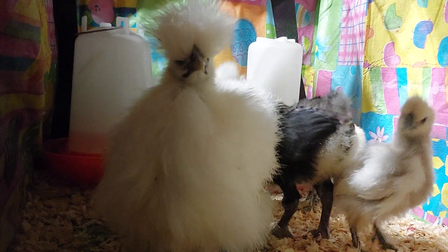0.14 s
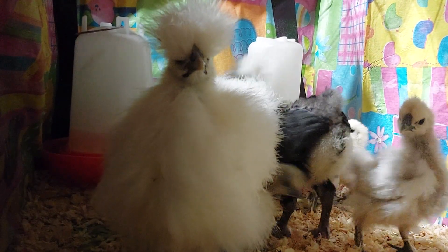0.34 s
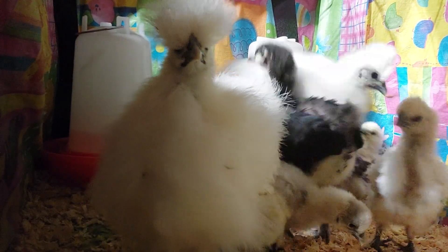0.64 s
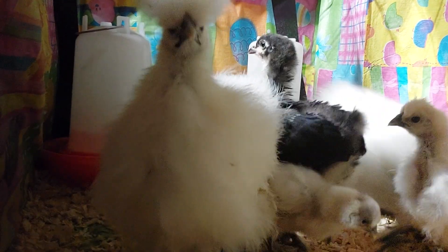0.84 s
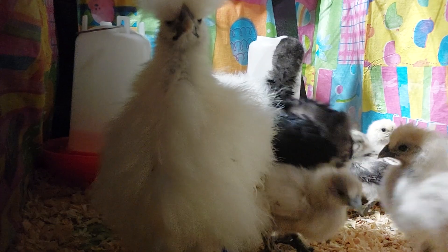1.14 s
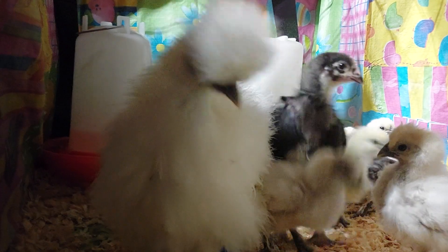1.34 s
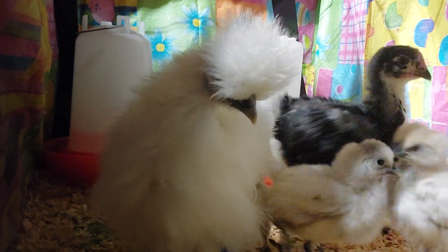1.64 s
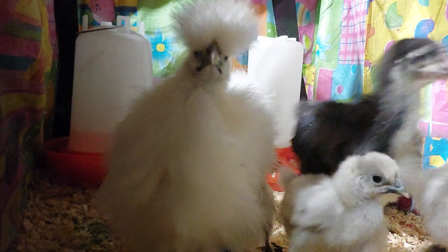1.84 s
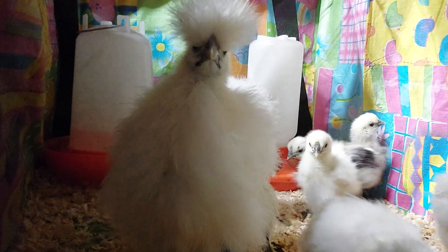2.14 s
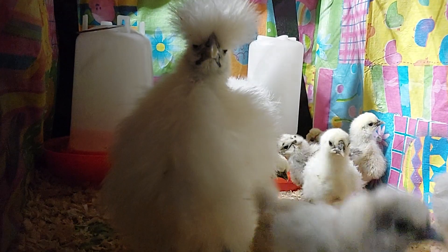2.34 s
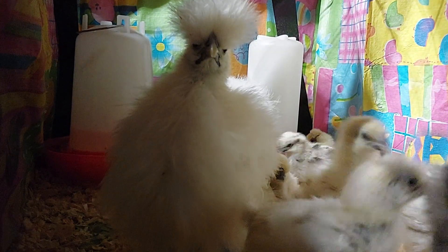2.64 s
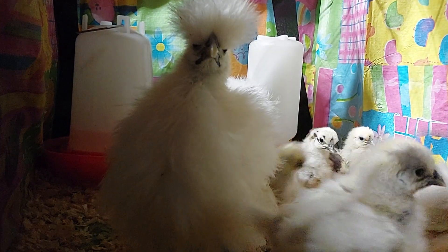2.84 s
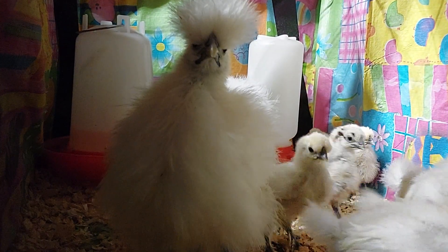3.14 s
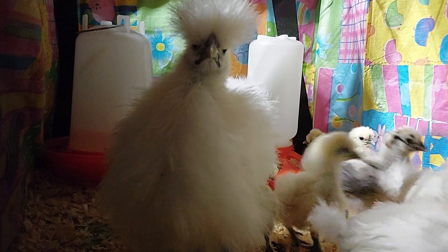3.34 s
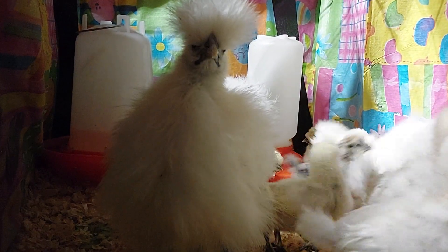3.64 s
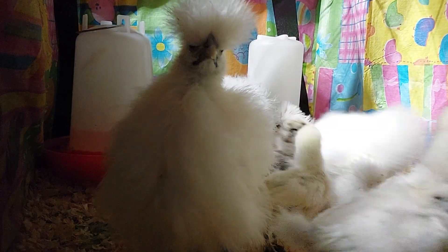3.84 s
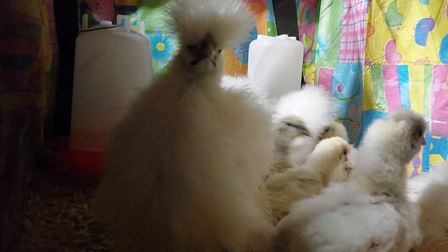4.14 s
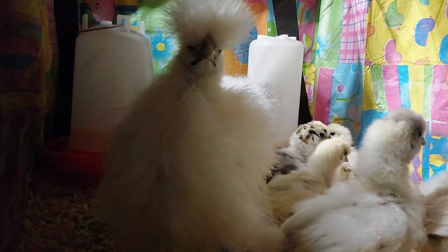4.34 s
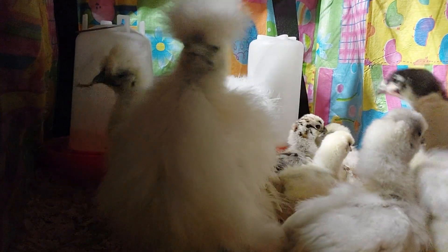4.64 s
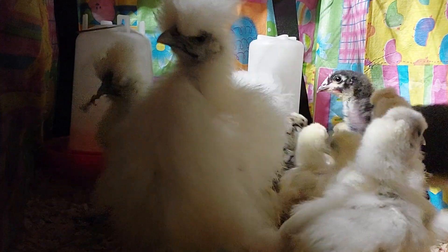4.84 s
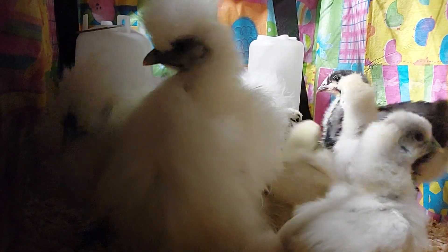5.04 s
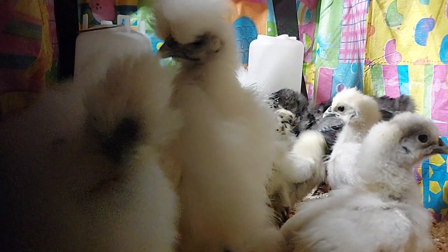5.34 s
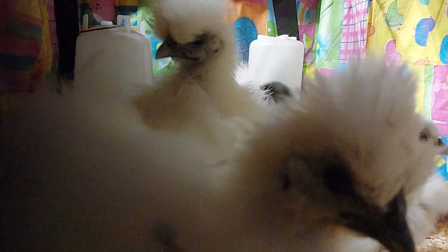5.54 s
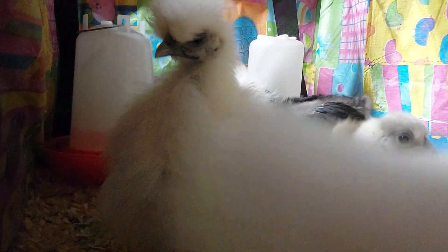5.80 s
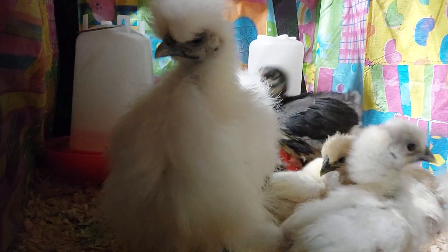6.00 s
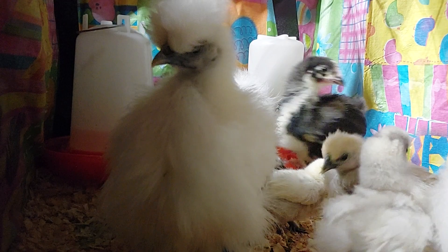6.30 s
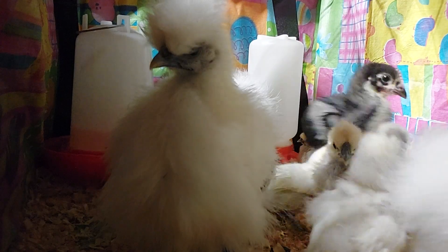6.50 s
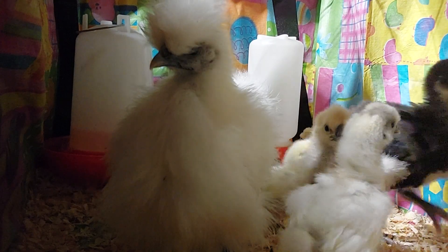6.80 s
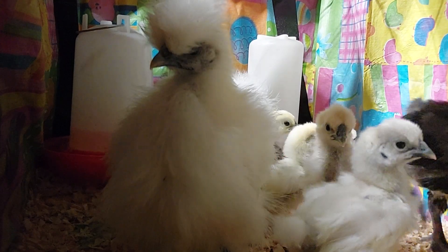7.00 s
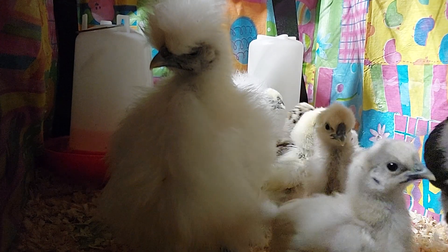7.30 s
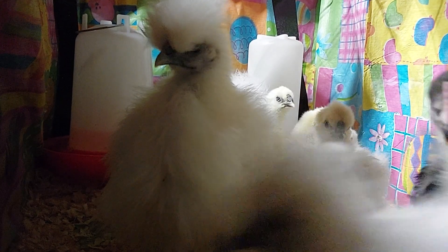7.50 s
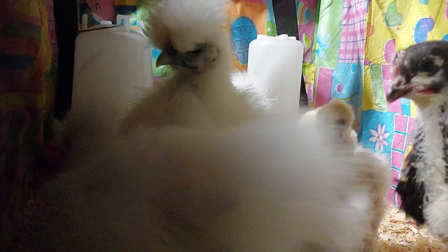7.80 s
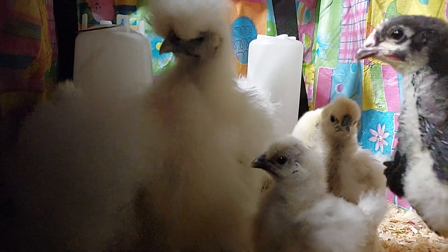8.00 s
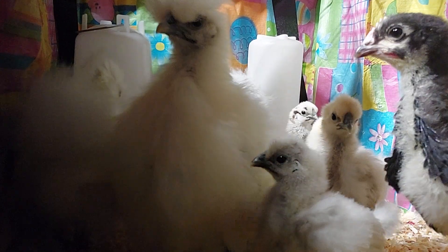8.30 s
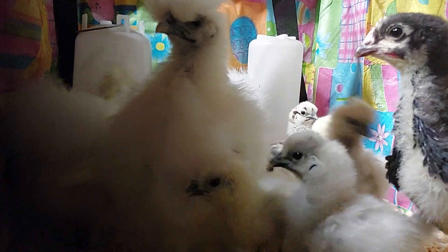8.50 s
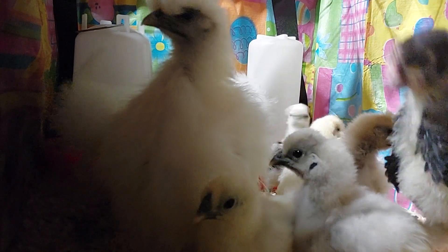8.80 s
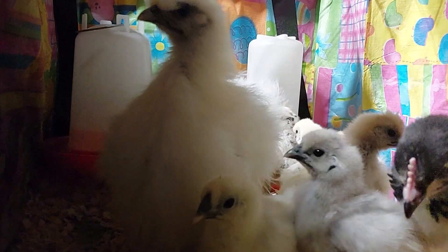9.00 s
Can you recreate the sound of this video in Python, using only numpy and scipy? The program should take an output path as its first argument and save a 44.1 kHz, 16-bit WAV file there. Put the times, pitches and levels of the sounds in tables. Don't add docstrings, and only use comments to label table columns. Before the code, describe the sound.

Crowded chicks peep brightly close by in a bedded pen, with raspy downward slides, low gulps, floor bumps and claws scuffing dry flakes.

```python
import sys
import numpy as np
from scipy import signal
from scipy.io import wavfile
from scipy.ndimage import uniform_filter1d

SR = 44100
rng = np.random.default_rng(int(sys.argv[2]) if len(sys.argv) > 2 else 0)


def file_out(sig):
    cols = np.atleast_2d(sig).T
    lim = np.clip(cols, -1, 1)
    pcm = np.round(lim * 32767).astype(np.int16)
    wavfile.write(sys.argv[1], SR, pcm)


def gain_from_db(level_db):
    decades = np.asarray(level_db, float) / 20
    return 10 ** decades


N = 403515


def rms_one(x):
    return x / np.sqrt(np.mean(x ** 2) + 1e-20)


def drift(rate_hz, count=N):
    r = np.exp(-2 * np.pi * rate_hz / SR)
    noise = rng.standard_normal(count + 9000)
    return rms_one(signal.lfilter([1], [1, -2 * r, r * r], noise)[9000:])


def band(x, low_hz, high_hz):
    sos = signal.butter(2, [low_hz, min(high_hz, SR * .45)], "band", fs=SR, output="sos")
    return signal.sosfilt(sos, x)


def ring(clicks, hz, t60_s):
    r, w = gain_from_db(-60 / (t60_s * SR)), 2 * np.pi * hz / SR
    return signal.lfilter([0, np.sin(w)], [1, -2 * r * np.cos(w), r * r], clicks + 1e-18)


def add(out, start, sound, pan_db, lag_ms):
    steps = np.arange(len(sound))
    for side, sign in enumerate((1, -1)):
        late = np.interp(steps - sign * lag_ms * SR / 2000, steps, sound)
        out[side, start:start + len(sound)] += (late * gain_from_db(sign * pan_db / 2))[:N - start]


def shavings(rustle_db):
    # hz, level_db per Hz
    flake_colour = [(350, -17.5), (700, -21), (1400, -20), (2900, -19.5), (5000, -18), (7500, -21.5),
                    (10000, -25), (12500, -22.5), (15500, -21)]
    # start_s, peak_db
    scratches = [(1.715, -70), (2.081, -55.5), (2.142, -50), (2.222, -65.5), (2.794, -60.5), (3.632, -68),
                 (6.6408, -58), (8.942, -72.5), (0.216, -85.5), (.412, -87), (4.598, -59), (7.6, -99),
                 (1.041, -66), (1.242, -59), (3.554, -90), (5.362, -71), (5.433, -64), (3.268, -64),
                 (4.39, -78), (7.284, -86), (.868, -69.5), (5.94, -68)]
    hz, per_hz_db = np.transpose(flake_colour)
    grain_chance = 400 * gain_from_db(3.5 * drift(8)) / SR
    grains = 1 + (rng.random((2, 2, N)) < grain_chance) * gain_from_db(18.0)
    white = rng.standard_normal((2, 2, N)) * grains
    own_db = [2.0 * drift(14) for k in range(3)]
    together_db = 3.0 * drift(25)
    out, edges_hz = 0, 250 * 2 ** np.arange(0, 6.5, .5)
    for k, (low, high) in enumerate(zip(edges_hz, edges_hz[1:])):
        colour_db = np.interp(np.log(low * high) / 2, np.log(hz), per_hz_db)
        gain_db = colour_db + together_db + own_db[k // 2 % 3]
        out = out + gain_from_db(gain_db) * band(white[k % 2], low, high)

    kicks = np.zeros(N)
    for s, db in scratches:
        kicks[int(s * SR)] = gain_from_db(db + 13.0)
    fade = np.exp(-1 / (0.012 * SR))
    bursts = uniform_filter1d(signal.lfilter([1], [1, -fade], kicks + 1e-18), 200, origin=99)
    top_rms = np.sqrt(np.mean(band(out, 10500, 15500) ** 2))
    return out / top_rms * (gain_from_db(rustle_db) + bursts) * gain_from_db(np.array([[-1.5], [1.5]]))


def taps():
    # start_s, peak_db, pitch_hz
    tap_rows = [(0.213, -31.5, 1330), (0.31, -29, 520), (0.433, -31, 426), (0.453, -29, 670),
                (0.912, -36, 684), (1.437, -34.5, 900), (1.721, -31, 395), (1.947, -32.5, 515),
                (2.083, -31, 398), (2.142, -31.5, 536), (2.408, -45, 670), (2.67, -31.5, 405),
                (3.583, -33, 670), (3.635, -28.5, 540), (3.703, -35, 420), (3.996, -31.5, 388),
                (4.197, -18.5, 520), (4.647, -17.5, 523), (4.882, -29, 668), (4.926, -28.5, 790),
                (5.225, -32.5, 423), (5.436, -34.5, 520), (5.586, -25, 710), (5.902, -42, 950),
                (6.872, -38, 520), (6.941, -29.5, 404), (7.597, -34, 760), (8.94, -25, 650),
                (8.977, -34.5, 509), (9.099, -44, 665), (2.085, -27.5, 1300), (2.15, -37, 1550),
                (2.411, -34, 1360), (4.198, -36, 1250), (1.441, -43, 1300), (0.002, -34.5, 1550)]
    # start_s, length_s, pitch_hz, level_db (rms)
    buzz_rows = [
        (4.472, 0.034, 199, -42.5),
        (4.563, 0.076, 207, -39.5),
    ]
    out, t = np.zeros(N + SR), np.arange(SR // 10) / SR
    for (s, db, hz), noise in zip(tap_rows, rng.standard_normal((len(tap_rows), len(t)))):
        knock = band(noise * np.exp(-t / 0.011), 0.49 * hz, 1.24 * hz)
        out[int(s * SR):][:len(t)] += gain_from_db(db - 5.0) * knock / np.abs(knock).max()
    for s, length_s, hz, db in buzz_rows:
        hump = np.clip(np.sin(np.pi * np.minimum(t / length_s, 1)), 0, 1) ** .5
        out[int(s * SR):][:len(t)] += gain_from_db(db + 7.5) * np.sin(2 * np.pi * hz * t) * hump
    return out[:N]


def floor(rumble_db):
    # start_s, peak_db, main_ring_hz
    bumps = [(0.448, -17, 156), (0.867, -15.5, 190), (1.052, -20.5, 95), (1.549, -19.5, 104),
             (2.085, -12.5, 82), (2.343, -18.5, 80.5), (2.564, -17.5, 101), (2.671, -12.5, 77.7),
             (2.799, -22.5, 118), (3.634, -15.5, 76), (3.815, -11.5, 134), (3.993, -18.5, 211),
             (4.199, -10.5, 230), (4.755, -21, 92.5), (6.54, -22, 67), (4.649, -13, 152),
             (4.954, -27.5, 108), (5.587, -26, 161), (5.656, -22.5, 140), (6.399, -23.5, 74),
             (6.617, -20, 96), (8.25, -23.5, 106), (8.942, -23, 197), (6.65, -22.5, 224),
             (6.889, -27.5, 305), (6.943, -24, 337), (1.716, -20, 240)]
    # hz, level_db, t60_s
    floor_modes = [(63.7, -0.5, 0.35), (87.6, -7.5, 0.48), (118.8, 0.5, 0.17), (225.7, -3, 0.1),
                   (395.5, -19, 0.14), (493, -21.5, 0.13), (787, -7.5, 0.017)]
    force = gain_from_db(3.13 * np.minimum(rng.exponential(1, N), 4))
    steps = (rng.random(N) < 300 / SR) * force * rng.choice([-1, 1], N)
    _, bump_db, bump_hz = np.transpose(bumps)
    at = [int(s * SR) for s, db, hz in bumps]
    chance = rng.standard_normal((len(bumps), len(floor_modes)))
    patter, thuds = 0, np.zeros(N)
    for k, (hz, level_db, t60_s) in enumerate(floor_modes):
        sign = (-1) ** k
        patter = patter + sign * gain_from_db(level_db) * ring(steps, hz, 0.45 * t60_s)
        late = (np.abs(chance[:, -k]) * .004 * SR).astype(int)
        detuned_db = 2.0 * np.abs(np.log2(hz / bump_hz))
        blows = np.zeros(N)
        blows[at + late] = gain_from_db(bump_db + level_db - 10.5 + 2.0 * chance[:, k] - detuned_db)
        thuds += sign * ring(blows, hz, t60_s)

    for i, (s, db, hz) in zip(at, bumps):
        part = thuds[i:i + SR // 5]
        n = np.arange(len(part))
        part += gain_from_db(db - 2.0) * ring(n == 0, hz, 8.1 / hz)
        crunch = rng.standard_normal(len(part)) * np.exp(-n / SR / 0.04)
        part += gain_from_db(db - 19.5) * band(crunch, 170, 570)
    cushion = signal.butter(2, 900, fs=SR, output="sos")
    return signal.sosfilt(cushion, gain_from_db(rumble_db) * rms_one(patter) + thuds) + taps()


def pen(x, t60_s, cut_hz):
    t = np.arange(int(.3 * SR)) / SR
    tail = band(rng.standard_normal((2, len(t))), 2300, cut_hz) * gain_from_db(-60 * t / t60_s) * (t > .002)
    return signal.fftconvolve(x, tail / np.sqrt(np.sum(tail ** 2) / 2), axes=1)[:, :N]


def contour(rows, round_s, lead_s):
    s, hz, level_db = np.transpose(rows)
    slope = np.clip(np.diff(hz) / np.diff(s), -4e4, 4e4)
    s = np.r_[s[0] - lead_s, s, s[-1] + lead_s]
    hz = np.r_[hz[0] - slope[0] * lead_s, hz, hz[-1] + slope[-1] * lead_s]
    level_db = np.r_[level_db[0] - 22, level_db, level_db[-1] - 22]
    start = max(int(s[0] * SR), 0)
    t = np.arange(start, int(s[-1] * SR)) / SR
    pitch = uniform_filter1d(np.interp(t, s, hz), max(int(round_s * SR), 1), mode="nearest")
    return start, pitch, np.sqrt(2) * gain_from_db(np.interp(t, s, level_db))


def warble(turns):
    turns, u = np.array(turns), np.linspace(0, 1, 7)[:-1, None]
    eased = np.c_[u, (1 - np.cos(np.pi * u)) / 2, u]
    return np.vstack([a + (b - a) * eased for a, b in zip(turns, turns[1:])] + [turns[-1:]])


def sag(start_s, length_s, start_hz, level_db):
    t = np.array([-0.0082, 0, length_s / 2, length_s])
    hz = start_hz * np.where(t < 0, 1 - 0.055, np.exp(-4.1 * t))
    return np.c_[start_s + t, hz, level_db - 30 * t]


def cheep(crest_s, half_s, crest_hz, level_db):
    u = np.linspace(-1, 1, 15)
    rising = u < 0
    s = crest_s + half_s * u * np.where(rising, 1.5, 1)
    depth_share, bend = np.where(rising, 0.15, 0.23), np.where(rising, 2.2, 3)
    return np.c_[s, crest_hz * (1 - depth_share * np.abs(u) ** bend), level_db - 4.5 * u ** 2]


def arch(start_s, hold_s, crest_hz, level_db, fall_share, fall_db):
    onset_dip, onset_s = 0.18, .012
    creep_share, creep_s, creep_bend = .035, .1, 2.3
    shoulder_hz, shoulder_s, shoulder_db = 520, .018, -3
    plunge_hz, plunge_s = 1743, .014
    t = np.linspace(0, hold_s, 16)
    v = np.linspace(0, 1, 8)[1:]
    u = np.linspace(0, fall_share, 8)[1:]
    dip = onset_dip * (np.exp(-t / onset_s) - np.exp(-hold_s / onset_s))
    rise_hz = crest_hz * (1 - dip - creep_share * ((hold_s - t) / creep_s) ** creep_bend)
    round_hz = crest_hz - shoulder_hz * v ** 1.7
    fall_hz = crest_hz - shoulder_hz - plunge_hz * u ** 0.72
    swell_db = -9 * np.exp(-t / 0.027) - 20 * (hold_s - t)
    round_db = swell_db[-1] + shoulder_db * v ** 2
    fade_db = swell_db[-1] + shoulder_db + fall_db * (u / fall_share) ** .3
    return np.c_[start_s + np.r_[t, hold_s + shoulder_s * v, hold_s + shoulder_s + plunge_s * u],
                 np.r_[rise_hz, round_hz, fall_hz],
                 level_db + np.r_[swell_db, round_db, fade_db]]


def small_calls():
    # start_s, hold_s, crest_hz, level_db (rms), pan_db
    full_peeps = [(-.006, 0.14, 4720, -28, -4.5), (.445, 0.16, 4770, -26.5, 6),
                  (1.084, 0.126, 4785, -27, 6), (1.858, 0.14, 4770, -23, 8), (2.876, 0.142, 4620, -31, 8),
                  (3.851, 0.095, 4450, -34.5, 13), (5.964, 0.11, 4727, -30.5, 5.5),
                  (6.366, 0.13, 4550, -40.5, -9), (8.039, 0.102, 4380, -44, -10),
                  (0.308, 0.041, 4560, -33.5, 2), (0.468, 0.025, 4610, -28, 5),
                  (5.775, 0.047, 4630, -43.5, 3), (5.925, 0.035, 4580, -37.5, 0),
                  (8.499, 0.046, 4570, -49, 10), (8.635, 0.035, 4660, -40, 3),
                  (8.784, 0.038, 4760, -40.5, 3), (8.929, 0.023, 4780, -50.5, 5),
                  (1.17, 0.061, 4480, -44, 4), (8.946, 0.011, 4180, -37.5, 14)]
    cut_peeps = [(.142, 0.085, 4430, -44.5, 11.5), (1.46, 0.15, 4836, -26, -5),
                 (2.339, 0.1445, 4660, -31, 12), (4.513, .152, 4630, -25, 4.5),
                 (5.161, 0.11, 4670, -32, -11), (5.661, 0.11, 4666, -24.5, -1),
                 (8.75, 0.12, 4280, -35, -7.5), (0.726, 0.077, 4655, -27, 3.5),
                 (0.887, 0.06, 4540, -35.5, 4), (8.405, 0.065, 4420, -33, -10), (6.581, .06, 4320, -47, 4),
                 (6.752, 0.048, 4650, -37.5, 5)]
    # crest_s, half_s, crest_hz, level_db (rms), pan_db
    cheeps = [
        (4.138, 0.039, 4785, -28.5, 10),
        (4.856, 0.033, 4860, -25, 1.5),
        (5.402, 0.035, 4860, -34.5, 1),
        (8.286, 0.03, 4730, -36, 3),
        (8.996, 0.039, 4480, -39, -4),
        (1.053, 0.022, 4580, -40, 5),
        (1.341, 0.021, 2830, -51.5, -5),
    ]
    # start_s, length_s, start_hz, level_db (rms), pan_db
    sags = [
        (0.268, 0.065, 4860, -35.5, 7),
        (0.447, 0.069, 4830, -42, 1),
        (0.778, 0.052, 4230, -49.5, 9),
        (.972, 0.067, 4900, -48.5, 1.5),
        (1.834, 0.048, 3100, -59, 16),
        (3.922, 0.046, 3430, -40.5, 6),
        (4.245, 0.019, 3740, -51, 0),
        (1.593, 0.021, 3900, -51.5, 0),
    ]
    # start_s, length_s, from_hz, to_hz, level_db
    glides = [(-0.002, .033, 2850, 2400, -51), (0.144, .018, 2600, 3900, -54),
              (0.88, .008, 2700, 3100, -52), (0.956, .026, 2950, 2450, -49.5),
              (0.983, .045, 2400, 2170, -51), (1.12, .03, 2450, 2400, -42), (1.349, .027, 2600, 2230, -44),
              (1.444, .03, 4620, 4480, -45), (1.585, .04, 2850, 2600, -51), (1.636, .03, 4700, 4250, -45.5),
              (2.006, .05, 3050, 2620, -40.5), (2.03, .025, 4650, 4270, -50),
              (2.977, .028, 2780, 2480, -48), (4.063, .033, 3550, 2700, -40), (4.05, .008, 3150, 3550, -47),
              (4.683, .013, 3100, 2300, -49.5), (4.762, .01, 3950, 3650, -30.5),
              (4.83, .013, 3850, 3150, -49.5), (4.885, .012, 3700, 2700, -42.5),
              (5.073, .035, 2850, 4400, -54), (5.758, .028, 3150, 2620, -48),
              (5.797, .007, 2550, 2250, -52.5), (6.49, .007, 3450, 2950, -36),
              (7.352, .026, 4800, 4570, -45), (8.081, .04, 3800, 2900, -60)]
    # s, pitch_hz, level_db (rms)
    warbles = [
        [(4.630, 3900, -27), (4.638, 2970, -19), (4.657, 3900, -18), (4.665, 3580, -17.5), (4.678, 4360, -22)],
        [(4.715, 5100, -33), (4.727, 3560, -23), (4.737, 4150, -17), (4.753, 2700, -31), (4.762, 3350, -24)],
        [(4.912, 3300, -37), (4.920, 4000, -22), (4.933, 3200, -31), (4.945, 3930, -18), (4.954, 3350, -30),
         (4.968, 4090, -24.5), (4.981, 4010, -30)],
        [(5.099, 2860, -50), (5.112, 4000, -27), (5.122, 3620, -32), (5.137, 4200, -30), (5.147, 3700, -28),
         (5.155, 3900, -54)],
    ]
    calls = [(arch(*row, 1, -12), pan_db) for *row, pan_db in full_peeps]
    calls += [(arch(*row, 0.2, -9.5), pan_db) for *row, pan_db in cut_peeps]
    calls += [(cheep(*row), pan_db) for *row, pan_db in cheeps]
    calls += [(sag(*row), pan_db) for *row, pan_db in sags]
    calls += [([(s, from_hz, db), (s + length_s, to_hz, db)], 7) for s, length_s, from_hz, to_hz, db in glides]
    return calls + [(warble(turns), 3) for turns in warbles]


def peeps():
    # pitch_hz, gain_db
    pitch_colour = [(2200, -2), (2600, 3), (3100, -6), (3500, -3), (3900, -13), (4250, -1), (4600, 0.1)]
    out = np.zeros((2, N))
    calls = small_calls()
    lags_ms = .03 * rng.standard_normal(len(calls)) - 0.056
    for (rows, pan_db), lag_ms in zip(calls, lags_ms):
        start, hz, height = contour(rows, round_s=.003, lead_s=.007)
        n = len(hz)
        waver = 0.0029 * drift(60, count=n) + 0.003 * drift(13, count=n)
        phase = 2 * np.pi * np.cumsum(hz * (1 + waver)) / SR
        tone = gain_from_db(np.interp(hz, *np.transpose(pitch_colour))) * np.sin(phase)
        tone += gain_from_db(-23.5 - 0.0012 * np.abs(hz - 3000)) * np.sin(2 * phase)
        tone += gain_from_db(-44.0) * np.sin(3 * phase)
        add(out, start, height * gain_from_db(1.6 * drift(51, count=n)) * tone, pan_db, lag_ms)
    return out


def slide(knee_s, length_s, start_hz, knee_hz, level_db, break_s, after_hz, break_hz,
          gulp_db, last_hz, span, bow, swell_db_per_s, lift_db):
    crack_s, drop_s, gulp_s, gulp_hz = 0.0047, .008, .012, 1870
    u = np.linspace(0, 1, 7)
    t = np.r_[-max(length_s, break_s + 2 * crack_s), -break_s - crack_s, break_s * (u - 1)]
    bowed_hz = after_hz + (knee_hz - after_hz) * u ** bow
    hz = np.r_[start_hz, min(after_hz + break_hz, start_hz), bowed_hz, (knee_hz + gulp_hz) / 2, gulp_hz, last_hz]
    call_db = level_db + swell_db_per_s * t + lift_db * np.r_[0, 0, u ** 3]
    catch_db = min(level_db, gulp_db) - 8
    return np.c_[knee_s + np.r_[t, drop_s / 2, drop_s, drop_s + gulp_s * span], hz,
                 np.r_[call_db, catch_db, gulp_db, gulp_db - 6]]


def slides():
    # knee_s, length_s (before the knee), start_hz, knee_hz, level_db (rms)
    calls = [(1.154, 0.096, 4150, 2485, -27), (1.666, 0.19, 4490, 2444, -23.5),
             (2.567, .11, 4230, 2830, -34), (2.967, 0.18, 4430, 2600, -29.5),
             (3.457, 0.165, 4340, 2710, -34), (4.206, 0.14, 4060, 2650, -33.5),
             (4.821, .058, 3430, 2590, -29), (5.6, 0.15, 4420, 2650, -30), (6.481, .23, 4490, 2466, -29),
             (6.791, 0.14, 4790, 2740, -25.5), (7.537, 0.22, 4424, 2550, -23.5),
             (8.322, 0.2, 4400, 2510, -35)]
    # pan_db (left minus right), lag_ms (left)
    places = [(4.5, 0.647), (-6.5, 0.5), (8, -0.003), (-5, 0.438), (10.5, -0.57), (6, -0.086), (15, 0.014),
              (16, -0.65), (13.5, 0.98), (-11, 0.48), (10, -0.063), (13.5, 0.93)]
    # level_db (rms), last_hz
    gulps = [(-38, 1850), (-30, 1780), (-33, 1750), (-24, 1480), (-21, 1720), (-27, 1550), (-24, 1550),
             (-33, 1380), (-32, 1450), (-17, 1320), (-25, 1330), (-38, 1480)]
    spans = [.4, .55, .6, .9, 1, 1, .9, .3, .55, 1.5, 1, 1.2]
    bows = [2.6, 3.0, 1.1, 2.1, 1.27, 2, 2.5, 3.3, 2.7, 0.95, 1.5, 2.3]
    # swell_db_per_s, lift_db (added towards the knee, negative fades)
    efforts = [(123, 4), (135, -1), (121, -1), (94, 5), (100, -10), (143, 1.5), (100, -0.5), (123, 1),
               (133, 4), (130, 4), (131, 0.5), (142, 4)]
    # break_s (before the knee), after_hz, break_hz, split_hz (second above first), second_db
    voices = [(.068, 3420, 33, 440, 2), (0.093, 3480, 140, 540, -4), (0.074, 3450, 188, 350, 5),
              (.068, 3400, 540, 310, -6), (0.041, 2950, 61, 570, 0), (0.058, 3480, 250, 550, -5),
              (0.063, 3300, 32, 850, -7), (0.049, 3060, 78, 520, 1.5), (0.19, 3560, 36, 360, 4.5),
              (.042, 3400, 650, 440, -9), (.082, 3550, 540, 350, -16.5), (0.061, 3250, 500, 640, -8)]
    out = np.zeros((2, N))
    for row, place, gulp, span, bow, effort, (*crack, split_hz, second_db) in zip(
            calls, places, gulps, spans, bows, efforts, voices):
        rows = slide(*row, *crack, *gulp, span, bow, *effort)
        start, hz, height = contour(rows, round_s=0.003, lead_s=.004)
        n = len(hz)
        hoarse = np.clip((hz - 3050) / 250, 0, 1)
        rough = np.clip((hz - 3200) / 550, 0, 1)
        waver = (0.002 + .013 * rough) * drift(130, count=n)
        phase = 2 * np.pi * np.cumsum(hz * (1 + waver)) / SR
        apart_hz = split_hz * np.clip((hz - 2300) / 1100, .6, 1)
        beat = 2 * np.pi * np.cumsum(apart_hz * (1 + 0.13 * drift(80, count=n))) / SR
        second = np.sin(phase + beat) + gain_from_db(-18.0) * np.sin(phase - beat) + gain_from_db(-23.5) * np.sin(phase - 2 * beat)
        overtones = sum(gain_from_db(db) * np.sin(k * phase) for k, db in enumerate((-8.0, -26, -26.5, -24.5), start=2))
        breath = rng.standard_normal((2, n))
        rasp = gain_from_db(-15) * band(breath[0], 1200, 6000) + gain_from_db(-28) * band(breath[1], 10500, 16000)
        rasp = rasp * gain_from_db(4.5 * drift(40, count=n))
        subharmonics = np.sin(phase / 2) + 0.37 * np.sin(phase / 3)
        breaks_db = 4.0 * np.maximum(rough, .25 * (hz < 2300)) * np.clip(drift(120, count=n), -2.5, .5)
        voice = np.sin(phase) + hoarse * gain_from_db(second_db) * second
        voice += (1 - 0.94 * hoarse) * np.clip(hz / 2600, 0, 1) ** 5 * overtones
        voice += gain_from_db(-34.5 + 5.3 * drift(70, count=n)) * subharmonics
        voice += (0.24 + hoarse + 0.63 * (hz < 2200)) * rasp
        add(out, start, height * gain_from_db(breaks_db + 0.89 * drift(66, count=n)) * voice, *place)
    return out


def scene():
    # s, rumble_db (tread on the floor), rustle_db (scuffing in the shavings)
    stir = [(0.0, -31.5, -59.5), (0.53, -34.5, -64.5), (1.65, -38.5, -59.5), (2.8, -41.5, -56.5),
            (3.08, -46, -69.5), (3.44, -44, -55.5), (3.74, -42, -62.5), (4.87, -43.5, -64),
            (5.07, -41.5, -67.5), (5.5, -44, -57), (6.191, -51, -71), (6.62, -44.5, -59),
            (7.21, -47.5, -68), (7.52, -37, -57.5), (7.85, -46.5, -63), (7.978, -49, -66.5),
            (8.84, -50, -69), (9.15, -51, -82)]
    s, rumble_db, rustle_db = np.transpose(stir)
    t = np.arange(N) / SR
    voices = peeps() + slides()
    boards = floor(np.interp(t, s, rumble_db))
    uneven = gain_from_db(-15.5) * band(np.roll(boards, 60), 60.0, 1100) + gain_from_db(-4.0) * band(boards, 280, 1600)
    uneven = uneven * np.array([[1], [-1]])
    walls = gain_from_db(-16.5) * pen(voices, t60_s=0.21, cut_hz=43000)
    return voices + walls + boards + uneven + shavings(np.interp(t, s, rustle_db))


def top_cut(x):
    return signal.sosfilt(signal.butter(12, 16640, fs=SR, output="sos"), x)


def record(dry):
    x = signal.sosfilt(signal.butter(4, 45, "high", fs=SR, output="sos"), dry)
    x = x + gain_from_db(-2.0) * band(x, 10770, 16000)
    x = signal.sosfilt(signal.cheby2(12, 60, 16080, fs=SR, output="sos"), x)
    return top_cut(x)


dry = scene()
out = record(dry)
file_out(out)
```